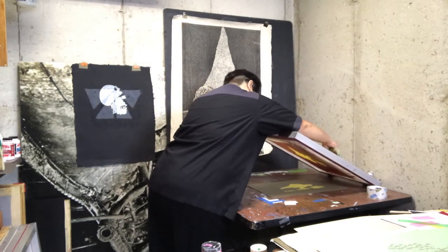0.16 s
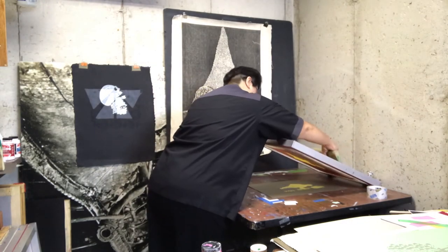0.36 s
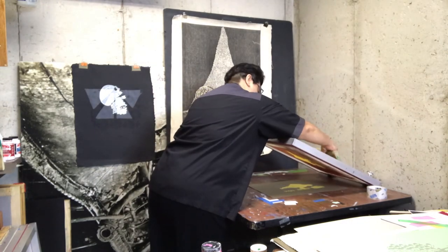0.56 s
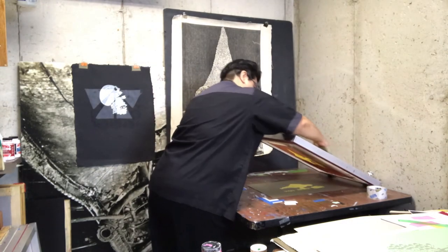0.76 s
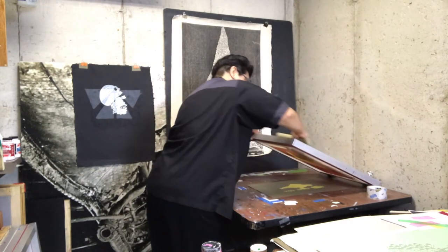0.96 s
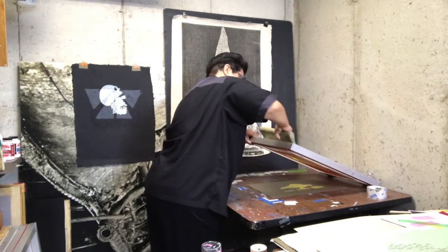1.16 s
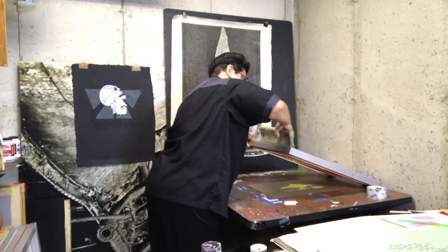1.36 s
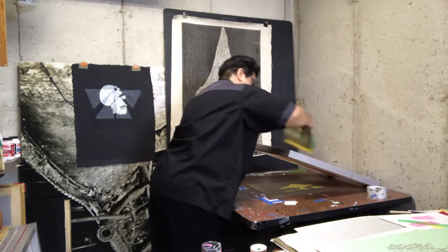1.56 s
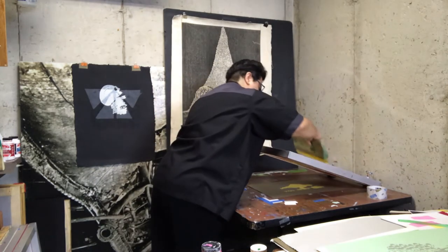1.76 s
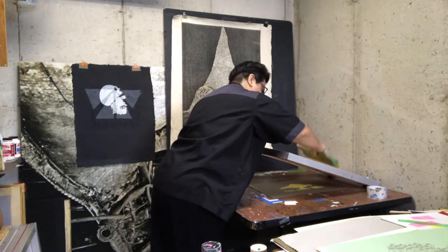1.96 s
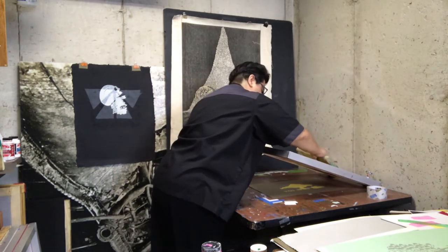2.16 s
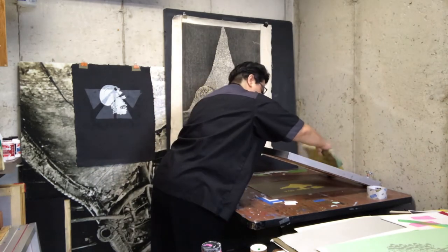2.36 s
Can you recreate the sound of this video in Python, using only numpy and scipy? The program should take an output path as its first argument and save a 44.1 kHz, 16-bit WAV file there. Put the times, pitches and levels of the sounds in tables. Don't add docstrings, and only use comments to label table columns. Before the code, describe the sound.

A squeegee scrapes a printing screen in a bare, hard-walled studio with low motor hum and soft air. A faint rub ends with a dull bump near 0.2 s. The blade lands around 0.5, stutters at 0.6, then hisses and sings upward until 1.15, bumping the frame, and lifts off with light squeaks by 1.45. Wooden knocks follow at 2.0, boomy, and 2.2, with a sharp, echoing snap.

```python
import sys
import numpy as np
from scipy import signal
from scipy.fft import rfft, irfft
from scipy.io import wavfile
from scipy.ndimage import uniform_filter1d

SR = 44100
rng = np.random.default_rng(int(sys.argv[2]) if len(sys.argv) > 2 else 0)


def materialize(psi):
    bounded = np.clip(np.atleast_2d(psi).T, -1, 1)
    quanta = np.round(bounded * 32767).astype(np.int16)
    wavfile.write(sys.argv[1], SR, quanta)


def amplitude_ratio(level_db):
    exponent = np.asarray(level_db, float) / 20
    return 10 ** exponent


N = 105840


def rms_one(x):
    return x / np.sqrt(np.mean(x ** 2) + 1e-20)


def at_hz(points, hz):
    table_hz, values = np.array(points).T
    return np.interp(np.log(hz + 1), np.log(table_hz), values)


def coloured(x, spectrum):
    gain = amplitude_ratio(at_hz(spectrum, np.fft.rfftfreq(len(x), 1 / SR)))
    return irfft(rfft(x) * gain, len(x))


def drift(rate_hz):
    r = np.exp(-2 * np.pi * rate_hz / SR)
    return rms_one(signal.lfilter([1], [1, -2 * r, r * r], rng.standard_normal(N + SR))[SR:])


def ring(x, hz, t60):
    r, w = amplitude_ratio(-60 / (t60 * SR)), 2 * np.pi * hz / SR
    return signal.lfilter([0, np.sin(w)], [1, -2 * r * np.cos(w), r * r], x + 1e-18)


def add(out, s, hit):
    i = int(s * SR)
    out[i:i + len(hit)] += hit[:N - i]


# pitch in Hz, level in dB.
HUM_LINES = [(59.2, -58), (118.4, -56.5), (236.9, -63.5), (296.1, -59.5), (538.3, -76), (861.3, -73.5),
             (1001, -71.5), (1039, -100), (1475, -76)]
# frequency in Hz, level in dB per Hz.
AIR_COLOUR = [(15, -38), (25, -11.5), (119, -10.5), (209, -8.5), (289, -9), (378, -13), (871, -19.5),
              (1200, -21), (15500, -45)]


def motor():
    t = np.arange(N) / SR
    hum = 0
    for hz, db in HUM_LINES:
        cycles = hz * t + rng.random() + 0.044 * drift(10)
        hum = hum + amplitude_ratio(db + 1.0 + 3.1 * drift(3.54)) * np.sin(2 * np.pi * cycles)
    air = rms_one(coloured(rng.standard_normal(N), AIR_COLOUR))
    return hum + amplitude_ratio(-57 + 0.6 * drift(20)) * air


# frequency in Hz, t60 in seconds.
STUDIO_DECAY = [(60, 0.43), (500, 0.33), (3000, 0.25), (8000, 0.16), (15000, 0.06)]


def studio(x):
    t, tail = np.arange(SR // 2) / SR, 0
    onset = np.clip(t / 0.0022 - 1, 0, 1)
    for low in 40 * 2. ** np.arange(9):
        octave = signal.butter(2, [low, min(2 * low, 19000)], "band", fs=SR, output="sos")
        band = signal.sosfilt(octave, rng.standard_normal(len(t)))
        tail = tail + band * amplitude_ratio(-60 * t / at_hz(STUDIO_DECAY, 1.4 * low))
    tail = rfft(tail * onset)
    tail = irfft(tail / np.sqrt(uniform_filter1d(abs(tail) ** 2, size=48)), len(t))
    tail = tail * onset * np.clip(1 - t / 0.81, 0, 1)
    return signal.fftconvolve(x, tail / np.sqrt(np.sum(tail ** 2)))[:N]


def bumps(rows):
    out, t = np.zeros(N), np.arange(SR // 2) / SR
    for s, db, hz, t60 in rows:
        pair = np.sin(2 * np.pi * hz * t) + 0.5 * np.sin(2 * np.pi * 1.18 * hz * t)
        add(out, s, amplitude_ratio(db - 60 * t / t60) * (1 - np.exp(-t / 0.0036)) * pair)
    return out


# start in seconds, level in dB, pitch in Hz, t60 in seconds.
TABLE_THUMPS = [
    (2.012, -31, 56, 0.32),
    (2.014, -30.5, 116, 0.26),
    (2.212, -46, 48, 0.24),
    (2.215, -29, 84.4, 0.24),
    (.19, -47, 58, 0.16),
]


def table_thumps():
    return bumps(TABLE_THUMPS)


# start in seconds, level in dB, pitch in Hz, t60 in seconds.
HINGE_BUMPS = [(.183, -31.5, 415, 0.052), (0.198, -31, 275, 0.061), (.210, -36, 400, 0.066),
               (0.633, -29.5, 285, 0.046), (.69, -37.5, 261, 0.098), (.915, -35.5, 790, 0.046),
               (0.931, -40, 192, 0.16), (0.986, -32.5, 309, 0.06), (1.005, -40.5, 199.7, 0.26),
               (1.0275, -31, 296, 0.061), (1.07, -56, 195, 0.16), (1.196, -29, 387, 0.031),
               (1.205, -29.5, 285.5, 0.056), (1.236, -41, 275, 0.19), (1.38, -42, 780, 0.031),
               (2.121, -34, 175, 0.12)]


def rocking(press_db):
    low_band = signal.butter(4, [170, 420], "band", fs=SR, output="sos")
    shake = rms_one(signal.sosfilt(low_band, rng.standard_normal(N)))
    rumble_db = -55.5 + 3.5 * drift(16) + 0.38 * (press_db - press_db.max())
    return amplitude_ratio(rumble_db) * shake + bumps(HINGE_BUMPS)


def struck(events, modes, touch_s):
    chance = rng.random((len(events), len(modes), 2))
    out, t = np.zeros(N), np.arange(SR // 10) / SR
    for (s, db), own in zip(events, chance):
        hit = 0
        for (hz, mode_db, t60), (weaker, phase) in zip(modes, own):
            level = amplitude_ratio(db + mode_db - 6.0 * weaker - 60 * t / t60)
            hit = hit + level * np.sin(2 * np.pi * (hz * t + phase))
        add(out, s, (1 - np.exp(-t / touch_s)) * hit)
    return out


# start in seconds, level in dB.
EDGE_SNAPS = [
    (2.2102, -31),
    (2.2126, -18),
    (2.2141, -12.5),
    (2.219, -44),
    (2.011, -31.5),
    (2.029, -34),
]
# pitch in Hz, level in dB, t60 in seconds.
HANDLE_MODES = [(1640, -12, .015), (1880, -9, .008), (2150, -9, .008), (2360, -3, .008), (2560, -1, .008),
                (2780, -1, .008), (3050, -3, .008), (3300, 1, .008), (3600, -5, .008), (4100, -12, .008)]


def snaps():
    return struck(EDGE_SNAPS, HANDLE_MODES, 0.00014)


# frequency in Hz, level in dB per Hz.
WASH_COLOUR = [(1200, -30), (2000, -12), (2400, 0.5), (3400, 3), (4200, -7.5), (6000, -27.5)]


def wash():
    out, t = np.zeros(N), np.arange(SR // 2) / SR
    noise = rms_one(coloured(rng.standard_normal(len(t)), WASH_COLOUR))
    add(out, EDGE_SNAPS[1][0], amplitude_ratio(-35 - 60 * t / 0.26) * (1 - np.exp(-t / .003)) * noise)
    return out


# start in seconds, push in dB, contact cut-off in Hz,
# crack level in dB, crack length in seconds.
KNOCK_CONTACTS = [
    (2.001, -41, 1500, -35, 0.033),
    (2.011, -22, 1500, -23.5, 0.0064),
    (2.016, -13.5, 1400, -29.5, 0.016),
    (2.024, -23, 916, -36, 0.0096),
    (2.185, -39, 1160, -43, 0.016),
    (2.19, -32, 690, -41, 0.014),
    (2.213, -31, 1485, -9, 0.0026),
    (2.2162, -6.5, 1104, -23, 0.011),
    (2.228, -40, 600, -29, 0.003),
    (2.252, -20, 690, -29.5, 0.0045),
]
# pitch in Hz, dB in the first knock, dB in the second knock, t60 in seconds.
FRAME_MODES = [(215.2, 1, -7, 0.21), (275, -1.5, -2.5, .25), (333.5, 0, -3, 0.22), (374.4, -2.5, 5, 0.15),
               (461.5, -15, -8.5, 0.29), (524.5, -15, -10, 0.19), (586.6, -2.5, -2.5, 0.15),
               (656.3, -9.5, -9, 0.22), (620.6, -9, -14, 0.26), (774, -3, -1.5, 0.1),
               (859.5, -10, -13.5, 0.11), (897, -8, -12.5, 0.16), (1140, -15, -18, 0.17),
               (1299, -4.5, -6, 0.11)]
# frequency in Hz, level in dB per Hz.
CRACK_COLOUR = [(410, -8), (807, -1.5), (1050, -6.5), (1290, -6), (1760, -14.5), (2910, -12.5),
                (3730, -22.5), (9000, -35), (15500, -54)]


def frame():
    chance = rng.random((len(KNOCK_CONTACTS), len(FRAME_MODES), 2))
    boom, crack, t = np.zeros(N), np.zeros(N), np.arange(SR // 2) / SR
    touch = 1 - np.exp(-t / .0015)
    for (s, push_db, cut_hz, crack_db, crack_s), own in zip(KNOCK_CONTACTS, chance):
        hit = 0
        for (hz, first_db, second_db, t60), (weaker, phase) in zip(FRAME_MODES, own):
            spot_db = first_db if s < 2.15 else second_db
            level = amplitude_ratio(push_db + spot_db - 3.5 - 2.2 * weaker - 60 * t / min(t60, .22))
            soft = 1 + (hz / cut_hz) ** 4
            hit = hit + level * np.sin(2 * np.pi * (hz * t + phase)) / soft
        burst = rms_one(coloured(rng.standard_normal(len(t)), CRACK_COLOUR))
        add(boom, s, touch * hit)
        add(crack, s, touch * amplitude_ratio(crack_db) * burst * np.exp(-t / crack_s))
    return boom * amplitude_ratio(1.8 * drift(45)), crack


def weave(rows):
    s, hz, db = np.transpose(rows)
    t = np.arange(N) / SR
    rate_hz = np.interp(t, s, hz)
    overtone = amplitude_ratio(-9) * (rate_hz / 5000) ** 2
    out = 0
    for part in range(5):
        uneven = 1 - .02 * part + .016 * drift(59.6)
        turn = 2 * np.pi * np.cumsum(rate_hz * uneven) / SR
        patchy = amplitude_ratio(-2.5 * part - 2.5 + 3 * drift(25))
        out = out + patchy * drift(120) * (np.sin(turn) + overtone * np.sin(2 * turn))
    return out * amplitude_ratio(np.interp(t, s, db, left=-120, right=-120))


# time in seconds, threads per second in Hz, level in dB.
LIGHT_DRAGS = [(.47, 3070, -76), (.495, 3050, -59), (.56, 3000, -83), (.6, 3010, -85), (1.14, 3990, -77),
               (1.165, 4050, -47), (1.19, 3910, -80), (1.24, 3740, -70), (1.28, 3760, -55),
               (1.34, 3580, -76), (1.4, 3500, -83)]


def drags():
    return weave(LIGHT_DRAGS)


# time in seconds, threads per second in Hz, level in dB.
CORNER_GLIDE = [
    (1.03, 4130, -55),
    (1.065, 3860, -47),
    (1.095, 3390, -48),
    (1.125, 2984, -49),
    (1.17, 2920, -80),
]


def corner():
    return weave(CORNER_GLIDE)


# start in seconds, level in dB.
GRIP_SKIPS = [
    (.590, -43.5),
    (.597, -49),
    (.604, -32),
    (.606, -29),
    (.610, -38),
    (.614, -27.5),
    (.618, -28.5),
    (.623, -31.5),
    (.628, -29),
    (.634, -40),
]
# pitch in Hz, level in dB, t60 in seconds.
SKIP_MODES = [(792, -3.5, 0.029), (1010, -4.5, 0.013), (1250, -2.5, 0.011), (1500, -0.5, 0.013),
              (1720, -5, .012), (1890, 0.5, 0.014), (1980, -6, 0.019), (2245, 6, 0.011), (2360, -9, 0.015),
              (3500, -8, 0.0094), (4050, -3, 0.011)]


def skips():
    return struck(GRIP_SKIPS, SKIP_MODES, .002)


# time in seconds, threads per second in Hz, level in dB.
STROKE_THREADS = [
    (0.589, 2047, -70),
    (.62, 2246, -57),
    (0.701, 3095, -51),
    (.8, 4165, -48),
    (.875, 5045, -50.5),
    (.97, 5000, -51),
    (1.05, 5050, -52),
    (1.11, 4950, -54),
]


def threads():
    return weave(STROKE_THREADS)


# time in seconds, hiss level in dB.
PRESSURE = [
    [(0.0, -63), (0.172, -76.5), (0.192, -67), (0.386, -88), (0.396, -80), (0.45, -99)],
    [(0.46, -88), (0.494, -67.5), (0.65, -55.5), (0.902, -50), (0.936, -49.5), (1.076, -53), (1.148, -56),
     (1.2, -61)],
    [(1.2, -63.5), (1.29, -60.5), (1.426, -71), (1.452, -100), (1.464, -82), (1.48, -74)],
]


def pressure_db():
    s, db = np.concatenate(PRESSURE).T
    return np.interp(np.arange(N) / SR, s, db, right=-120)


# frequency in Hz, level in dB per Hz.
HISS_COLOUR = [(290, -46), (500, -12), (758, -6.5), (1770, -14.5), (1900, 0), (4840, -5.5), (5920, -10.5),
               (9650, -12), (15500, -26.5)]
# pitch in Hz, width in Hz, level in dB.
BLADE_MODES = [(780, 210, -8), (1547, 75, 6), (1623, 140, 6), (1798, 160, 11.5), (2470, 28, -10),
               (2830, 28, -17), (3950, 430, 6), (7550, 270, 1), (11870, 350, -27)]


def rub(press_db):
    slips_db = 2.5 * np.minimum(rng.exponential(1, N), 4) + 0.79 * drift(33)
    grit = rng.standard_normal(N) * amplitude_ratio(slips_db)
    hiss = rms_one(coloured(grit, HISS_COLOUR))
    body = sum(amplitude_ratio(db) * rms_one(ring(grit, hz, 3.3 / width)) for hz, width, db in BLADE_MODES)
    return amplitude_ratio(press_db + 6) * (hiss + amplitude_ratio(-6) * rms_one(body))


def scene():
    press_db = pressure_db()
    blade = rub(press_db) + threads() + corner() + drags() + skips()
    boom, crack = frame()
    wood = rocking(press_db) + table_thumps() + crack
    snap = snaps()
    to_room = wood + amplitude_ratio(-6) * snap + amplitude_ratio(-7) * boom + amplitude_ratio(-6.5) * blade
    direct = blade + wood + snap + boom
    return (direct + amplitude_ratio(-1) * studio(to_room) + motor() + wash())[None]


def top_cut(x):
    return signal.sosfilt(signal.butter(12, 15810, fs=SR, output="sos"), x)


def record(dry):
    treble_cut = signal.cheby2(22, 50, 16050, fs=SR, output="sos")
    bass_cut = signal.butter(2, 32, "high", fs=SR, output="sos")
    mix = signal.sosfilt(bass_cut, signal.sosfilt(treble_cut, dry))
    return top_cut(mix)


dry = scene()
out = record(dry)
materialize(out)
```